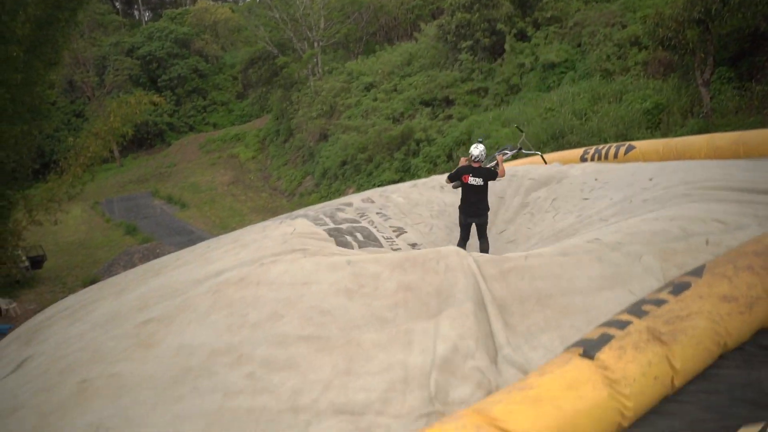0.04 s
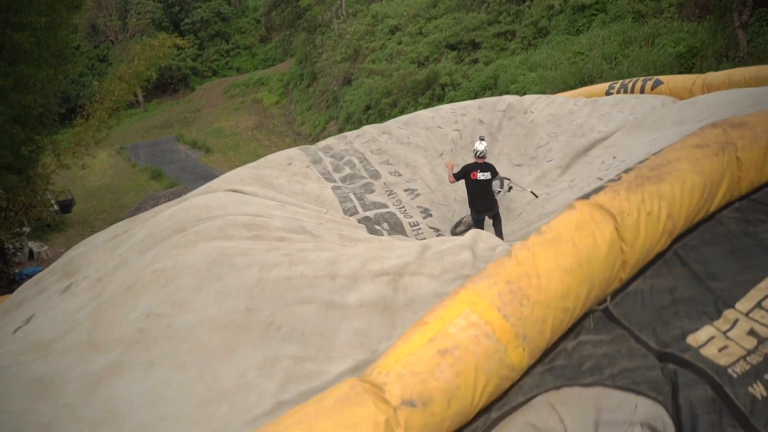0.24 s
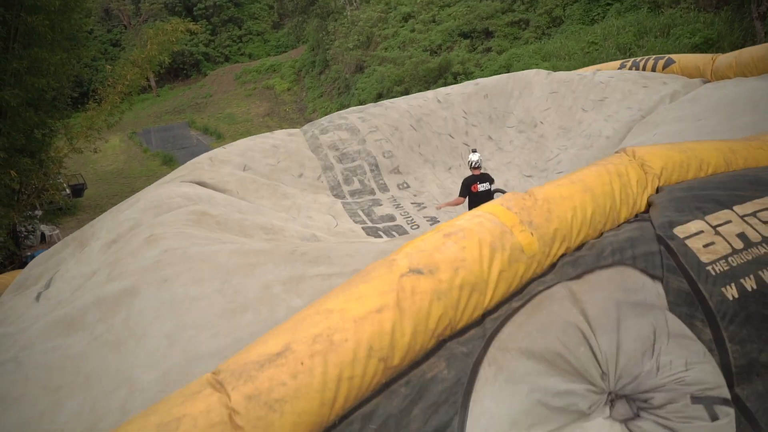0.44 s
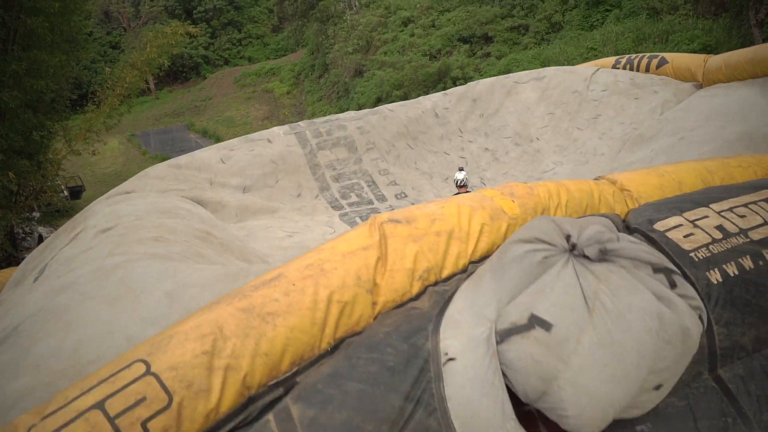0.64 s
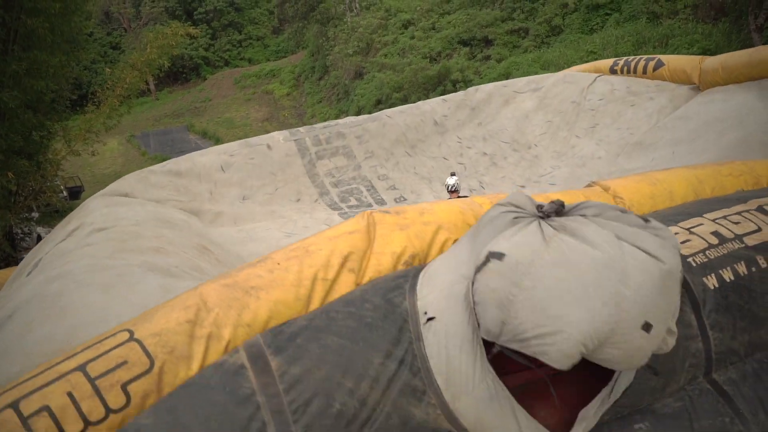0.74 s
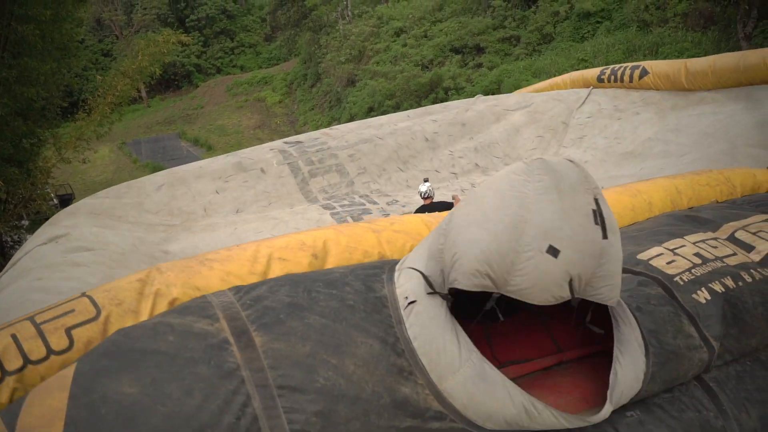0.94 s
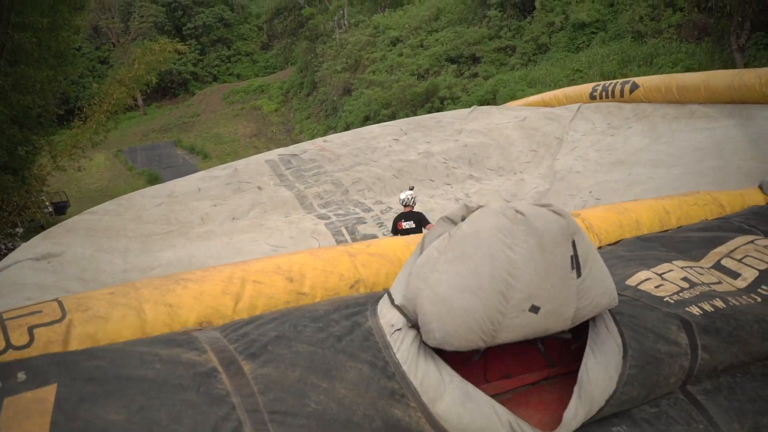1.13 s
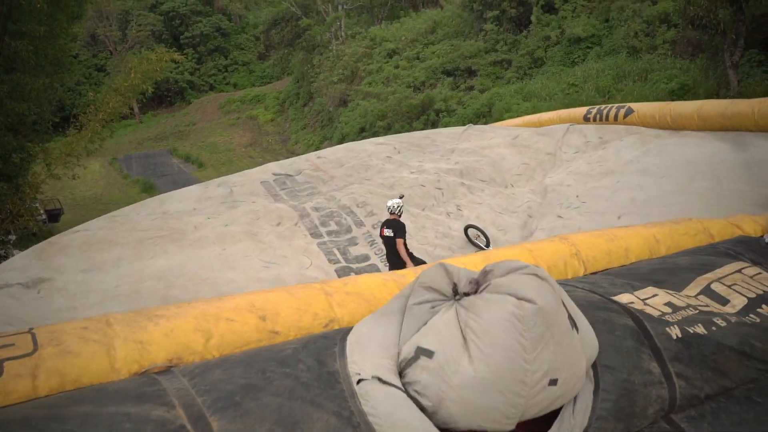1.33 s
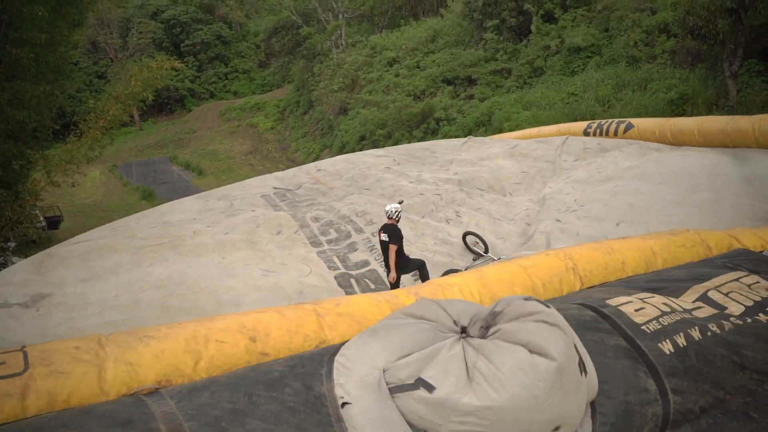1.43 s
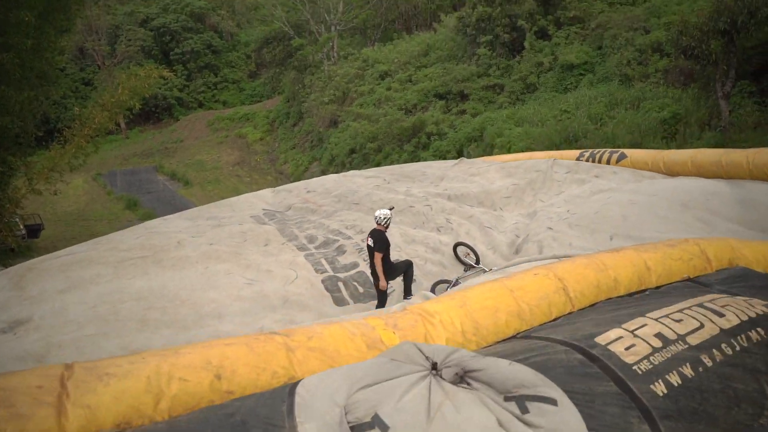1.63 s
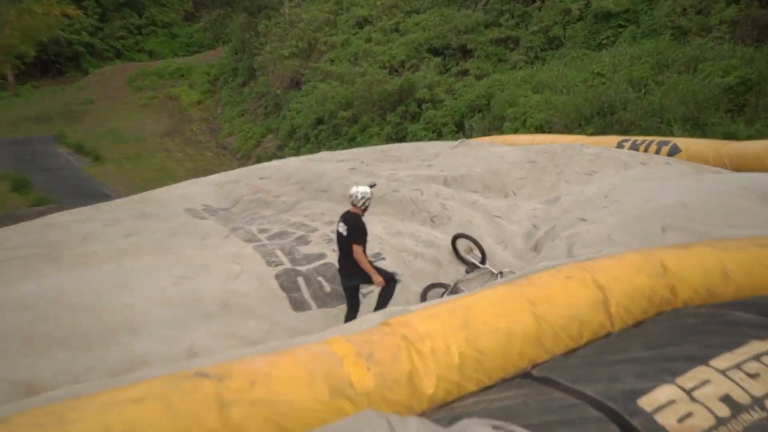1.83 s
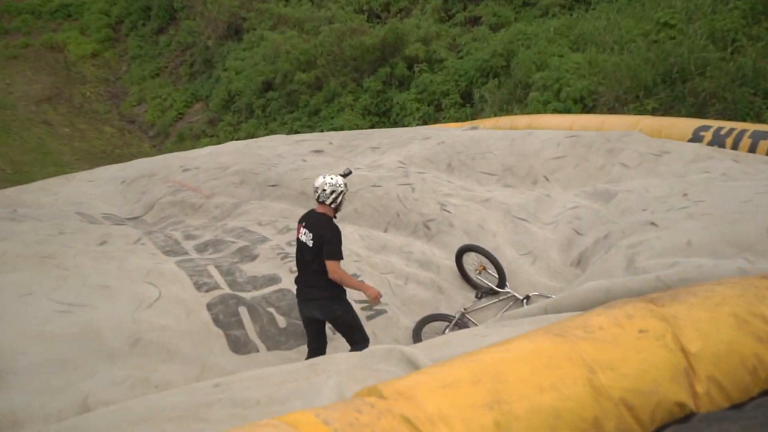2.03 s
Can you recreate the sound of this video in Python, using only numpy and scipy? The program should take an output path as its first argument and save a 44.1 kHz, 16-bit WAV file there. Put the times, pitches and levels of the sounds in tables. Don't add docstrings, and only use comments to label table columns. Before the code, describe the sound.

A bicycle and rider hit a large inflatable bag outdoors with a cluster of heavy thumps, slaps and part rattles; air rushes from the vents, then eases while smaller bumps and a few metal ticks follow.

```python
import sys
import numpy as np
from scipy import signal
from scipy.io import wavfile

SR = 44100
rng = np.random.default_rng(int(sys.argv[2]) if len(sys.argv) > 2 else 0)


def volts(x):
    e = np.asarray(x, float) / 20
    return 10 ** e


def generate_wav(sig):
    pcm = np.round(np.clip(np.atleast_2d(sig).T, -1, 1) * 32767).astype(np.int16)
    wavfile.write(sys.argv[1], SR, pcm)


N = 91419
CROSSOVER_HZ = 1200
LOW_EDGES_HZ = CROSSOVER_HZ * 2 ** np.arange(-6, .1, .4)
HIGH_EDGES_HZ = np.geomspace(CROSSOVER_HZ, 17500, 19)


def rms_one(x):
    return x / np.sqrt(np.mean(x ** 2) + 1e-20)


def drift(rate):
    step, run_in = 40, 2000
    r = np.exp(-2 * np.pi * rate * step / SR)
    white = rng.standard_normal(N // step + run_in + 2)
    slow = signal.lfilter([1], [1, -2 * r, r * r], white)[run_in:]
    return np.interp(np.arange(N) / step, np.arange(len(slow)), rms_one(slow))


def resonate(x, hz, width_hz):
    r = np.exp(-np.pi * width_hz / SR)
    poles = [1, -2 * r * np.cos(2 * np.pi * hz / SR), r * r]
    return signal.lfilter(np.array([1, 0, -1]) * (1 - r * r) / 2, poles, x)


def resonate_twice(x, hz, width_hz, second_width_hz):
    return resonate(resonate(x, hz, width_hz), hz, second_width_hz)


def air(spectrum, edges, swing_db, patchy_db, brightens):
    out = 0
    together = drift(12) + .4 * drift(3)
    hz_at, db_at = np.transpose(spectrum)
    white = rng.standard_normal((2, N + 8192))
    for k, (low, high) in enumerate(zip(edges, edges[1:])):
        bandpass = signal.butter(2, [low, high], "band", fs=SR, output="sos")
        band = signal.sosfilt(bandpass, white[k % 2])[-N:]
        hz = np.sqrt(low * high)
        level_db = np.interp(np.log(hz), np.log(hz_at), db_at)
        flicker_db = patchy_db * (0.57 * together + drift(6.4))
        brightening_db = brightens * np.log2(hz / edges[0]) * swing_db
        out = out + band * volts(level_db + flicker_db + brightening_db)
    return rms_one(out)


def grains(per_s, low_hz, high_hz, cycles, positive_share):
    struck = rng.random(N) < per_s / SR
    blows = volts(2.5 * np.minimum(rng.exponential(1, N), 3)) * struck
    blows = blows * np.where(rng.random(N) < positive_share, 1, -1)
    dealt = rng.integers(0, 12, N)
    out = 0
    for k, hz in enumerate(np.geomspace(low_hz, high_hz, 12)):
        drive = blows * (dealt == k) / hz * high_hz + 1e-18
        out = out + resonate_twice(drive, hz, hz / cycles, 2 * hz / cycles)
    return rms_one(out)


# f/Hz, spectral density level/dB
BLOWER_SPECTRUM = [(650, -30), (1100, -8), (1330, 3), (2410, -9.5), (3680, -12), (5070, -15), (12700, -35),
                   (15500, -33)]


def blower():
    return volts(-50) * air(BLOWER_SPECTRUM, HIGH_EDGES_HZ, 0, patchy_db=0.13, brightens=0)


# t/s, level/dB
VENT_FLOW = [
    (0.0, -30),
    (0.13, -28),
    (0.3, -25.5),
    (0.37, -27.5),
    (0.59, -32),
    (0.95, -36),
    (2.07, -40.5),
]


def flow_swing():
    s, db = np.transpose(VENT_FLOW)
    swing = np.interp(np.arange(N) / SR, s, db)
    return swing - swing.mean()


def crackle(swing):
    return volts(-48 + 1.1 * swing) * grains(450, 970, 4900, cycles=2.2, positive_share=0.48)


def flaps(swing):
    return volts(-33 + 0.48 * swing) * grains(220, 96.6, 424, cycles=1.53, positive_share=0.82)


# f/Hz, spectral density level/dB
HISS_SPECTRUM = [(650, -31), (1100, -3), (1530, -7.5), (1680, -5), (2670, -10), (3890, -9), (4960, -18),
                 (13100, -30.5), (15500, -31)]


def hiss(swing):
    return volts(-41 + 1.053 * swing) * air(HISS_SPECTRUM, HIGH_EDGES_HZ, swing, patchy_db=1.36, brightens=0.02)


# f/Hz, spectral density level/dB
ROAR_SPECTRUM = [(14, -41), (24, -9.5), (138, -2.5), (173, -5), (205, -0.5), (255, -4), (347, -6.5),
                 (384, -8.5), (1400, -22.5), (1820, -52), (3080, -120)]


def roar(swing):
    return volts(-26.5 + 0.74 * swing) * air(ROAR_SPECTRUM, LOW_EDGES_HZ, swing, patchy_db=.8, brightens=0.033)


# t/s, length/s, level/dB, f/Hz
SCUFFS = [(-0.05, 0.22, -45.5, 7160), (0.03, 0.17, -56, 12500), (0.095, 0.054, -32.5, 1240),
          (0.19, .024, -40, 7000), (0.268, 0.011, -41.5, 12100), (0.27, 0.31, -38, 1020),
          (0.325, 0.037, -44, 4000), (0.33, 0.055, -51, 12500), (0.33, 0.25, -48, 12100),
          (0.3, 0.34, -43, 2770), (0.468, 0.044, -36, 1500), (0.647, 0.092, -48, 12500),
          (0.927, 0.077, -51, 9700), (1.19, .05, -61, 12500), (1.135, 0.17, -38, 460),
          (1.397, 0.58, -49.5, 3470), (-0.3, 0.82, -54, 11000), (0.42, 0.21, -48, 5500),
          (1.36, 0.5, -61, 7400), (0.217, 0.14, -37, 1080), (0.727, 0.085, -56, 12000),
          (1.0, 0.25, -65, 12000), (2.054, .012, -56, 11000)]


def scuffs():
    out = np.zeros(N)
    white = rng.standard_normal(N) * volts(2.2 * drift(140))
    for s, length, db, hz in SCUFFS:
        progress = np.clip((np.arange(N) / SR - s) / length, 0, 1)
        stroke = np.sin(np.pi * progress) ** 1.4
        width_hz = 0.8 * hz
        out += volts(db) * stroke * rms_one(resonate_twice(white, hz, width_hz, width_hz))
    return out


def strikes(table, width, broad_db):
    out = np.zeros(N + SR)
    t = np.arange(SR // 10) / SR
    first_instant = 2.4 * 2 * (t < 1.5 / SR)
    for s, db, hz, t60 in table:
        decay = volts(-60 * t / t60)
        burst = (rng.standard_normal(len(t)) + first_instant) * decay
        ring = resonate_twice(burst, hz, width * hz, 2 * width * hz)
        crack = resonate_twice(burst * decay, hz, 1.8 * hz, 1.8 * hz)
        hit = ring / np.abs(ring).max() + volts(broad_db) * crack / np.abs(crack).max()
        start = int(s * SR)
        out[start:start + len(t)] += volts(db) * hit
    return out[:N]


# t/s, peak level/dB, f/Hz, t60/s
SEAM_SNAPS = [(0.1962, -26, 4500, 0.017), (0.2688, -28, 4500, .02), (0.2722, -27, 10000, .025),
              (0.2788, -26, 6500, 0.011), (0.2998, -32, 4500, 0.0091), (0.3098, -30, 9000, .008),
              (0.315, -34, 9000, 0.0069), (0.3945, -30, 5000, .02), (0.656, -40, 11000, .015),
              (0.6795, -37, 12500, .03), (0.694, -34, 11000, 0.027), (0.8899, -39, 9000, .01),
              (0.956, -35, 8000, .02), (2.025, -39, 6500, 0.018)]


def snaps():
    return strikes(SEAM_SNAPS, width=.9, broad_db=-10)


# t/s, peak level/dB, f/Hz, t60/s
METAL_PINGS = [(0.243, -28, 4070, 0.015), (0.287, -37, 12800, .015), (0.2998, -35, 13500, .008),
               (0.346, -25.5, 3630, .03), (0.370, -31, 3700, .03), (0.413, -25, 2520, 0.025),
               (0.418, -32, 3700, .02), (0.447, -37, 3750, .03), (0.5862, -31, 5400, .008),
               (1.8148, -34, 4430, .035), (1.8155, -34.5, 5300, .025), (1.8143, -43, 12500, .035),
               (1.8365, -46, 12200, 0.026), (1.8365, -40, 4800, .025), (2.009, -51, 12500, .01),
               (2.0327, -42, 12500, .02), (2.0327, -38, 6950, .02), (2.0408, -43, 13500, .015),
               (2.0560, -29, 4300, 0.046), (2.0560, -37, 5200, .02), (2.0560, -38, 6700, .015),
               (2.0560, -44, 12000, .015), (2.0587, -48, 10400, .02), (2.0640, -38, 13000, .010),
               (2.0562, -39, 14000, .010) ]


def pings():
    return strikes(METAL_PINGS, width=.13, broad_db=-18)


# t/s, peak level/dB, f/Hz, t60/s
PART_TICKS = [(0.1962, -15, 3480, 0.067), (0.198, -23, 7500, 0.041), (0.209, -24, 5200, 0.033),
              (0.214, -17, 3300, .03), (0.2695, -19, 3500, 0.03), (0.2695, -37, 11700, 0.021),
              (0.2789, -15, 3300, 0.012), (0.283, -24, 5900, 0.024), (0.3098, -16, 3350, 0.021),
              (0.3152, -27, 7400, 0.008), (0.136, -17.5, 1040, .02), (0.394, -27, 2200, 0.024),
              (0.582, -25, 1700, .02), (0.7936, -33, 1650, .03), (0.8899, -34.5, 2000, 0.018),
              (1.6307, -33, 1500, 0.018), (0.618, -27, 2500, 0.034), (0.88, -28, 3600, 0.03),
              (0.6265, -35, 13500, .015), (1, -30, 2100, 0.061), (1.000, -44, 13000, .015),
              (1.5, -33, 1100, .02), (1.787, -31, 1500, .03), (1, -29, 3000, .015),
              (1.1705, -29.5, 1760, .02), (0.7160, -20, 2350, .014), (1.8452, -29, 2200, .025),
              (0.3187, -15, 1300, .012), (1.845, -36, 3700, .02), (0.315, -25, 3400, .015),
              (0.25, -22, 1400, 0.025), (0.234, -22.5, 1600, 0.034), (1.989, -48, 14000, .015),
              (1.8455, -33, 1100, .02), (2.0283, -37, 7600, .025), (2.0408, -36, 7300, 0.013)]


def ticks():
    return strikes(PART_TICKS, width=.35, broad_db=-12)


# t/s, peak level/dB, f/Hz, length/cycles
SKIN_THUMPS = [(0.0005, -21, 38.5, 1.8), (0.002, -17, 88, 1.4), (0.183, -5, 587, 1.06),
               (0.1962, -4.5, 231, 0.86), (0.2126, -4.5, 97, 2.2), (0.4122, -6, 335, 4.2),
               (0.411, -13, 85, 2.6), (0.222, -12, 53.4, 2.3), (0.2489, -5, 342, 1.76),
               (0.2677, -14.5, 140, 4.2), (0.2687, -10, 750, 0.96), (0.2693, -9.5, 330, 1.5),
               (0.276, -10.5, 101, 2.9), (0.3355, -9.5, 200, 1.6), (0.3461, -11, 170, 1.3),
               (0.367, -19, 188, 0.97), (0.331, -17, 100.5, 3.4), (0.4058, -15, 230, 1.6),
               (0.433, -15, 220, 0.87), (0.44, -13, 139, 0.88), (0.4843, -16, 500, 1.1),
               (0.487, -17, 300, 1.1), (0.484, -16.5, 104, 1.9), (0.543, -29, 150, 1.8),
               (0.772, -13.5, 124, 1.2), (1.04, -15, 254, 3.1), (1.151, -21, 680, 2),
               (1.148, -20, 139, 1.6), (1.1606, -16.5, 130, 2.2), (1.2028, -17, 260, 1.6),
               (1.262, -19, 207, 1.7), (1.844, -22, 366, 3.3)]


def thumps():
    out = np.zeros(N + SR)
    for s, db, hz, cycles in SKIN_THUMPS:
        t = np.arange(int(cycles / hz * SR)) / SR
        u = t * hz / cycles
        sag = .3 * (2 / cycles) ** 2 * (.5 - u / 2)
        envelope = np.sin(np.pi * u ** .7) ** 1.3
        push = -np.sin(2 * np.pi * hz * t * (1 + sag)) * envelope
        start = int(s * SR)
        out[start:start + len(t)] += volts(db) * push / np.abs(push).max()
    return out[:N]


def scene():
    swing = flow_swing()
    vents = crackle(swing) + flaps(swing) + hiss(swing) + roar(swing)
    bicycle_and_seams = snaps() + pings() + ticks()
    return (blower() + vents + scuffs() + bicycle_and_seams + thumps())[None]


def low_pass(x):
    return signal.sosfilt(signal.butter(12, 15950, fs=SR, output="sos"), x)


def record(dry):
    x = dry + volts(-16.5) * resonate(dry, 4000, 170)
    limit = 1.6
    x = limit * np.tanh(x / limit)
    lowpass = signal.ellip(10, .3, 25, 15850, fs=SR, output="sos")
    x = signal.sosfilt(lowpass, x)
    return low_pass(x)


dry = scene()
out = record(dry)
generate_wav(out)
```